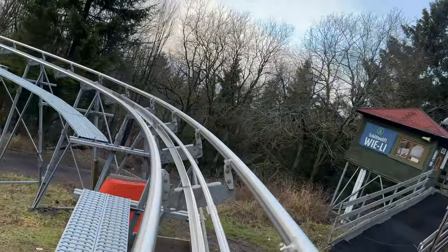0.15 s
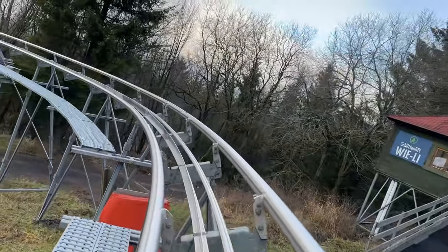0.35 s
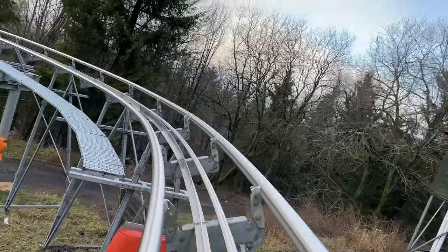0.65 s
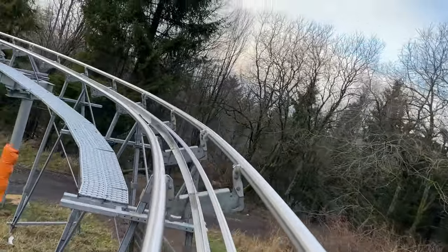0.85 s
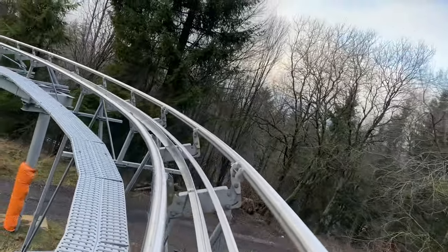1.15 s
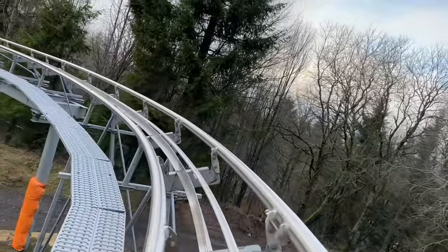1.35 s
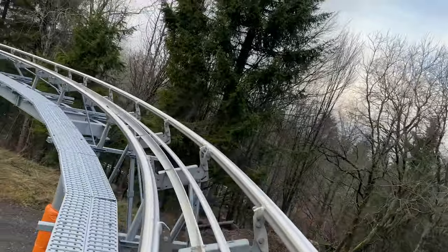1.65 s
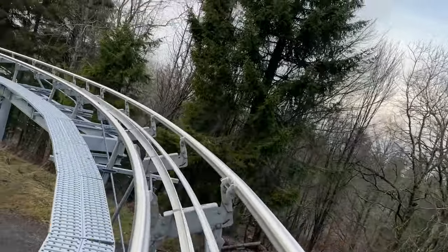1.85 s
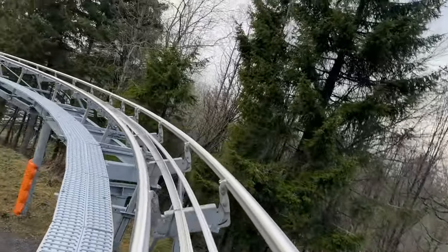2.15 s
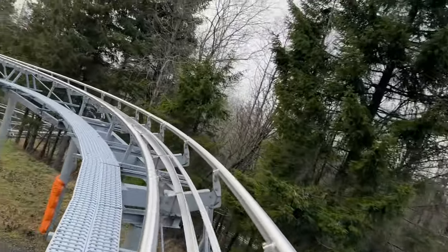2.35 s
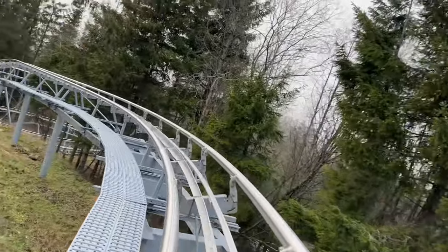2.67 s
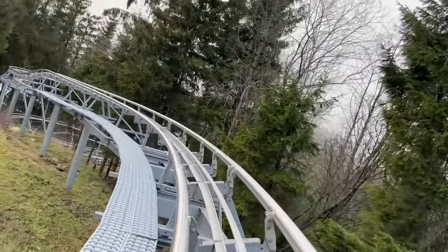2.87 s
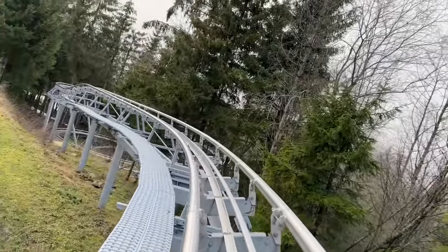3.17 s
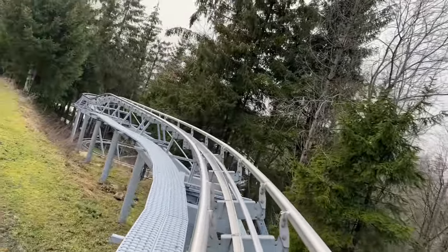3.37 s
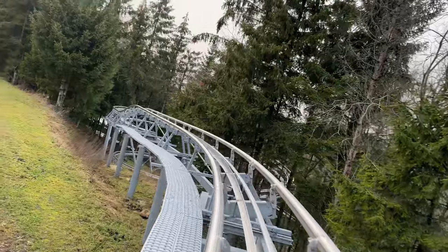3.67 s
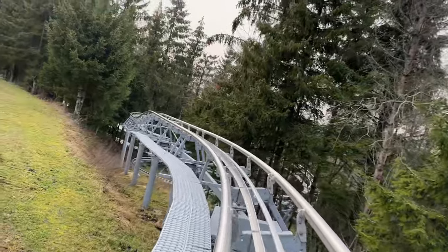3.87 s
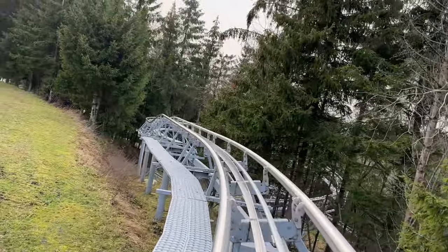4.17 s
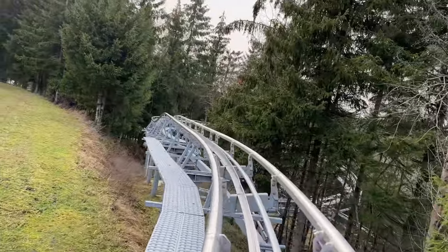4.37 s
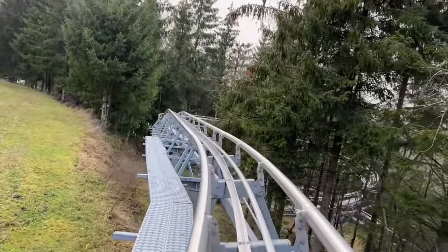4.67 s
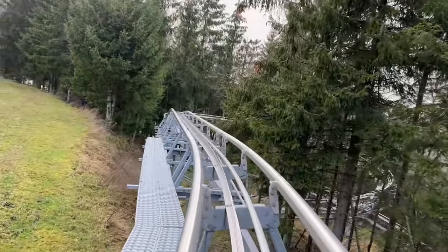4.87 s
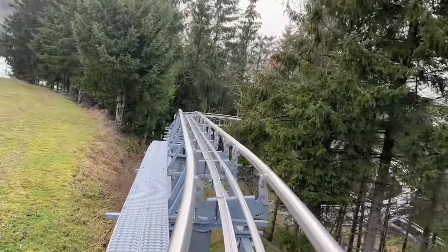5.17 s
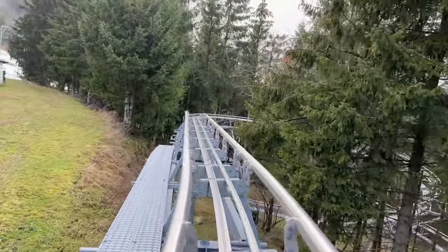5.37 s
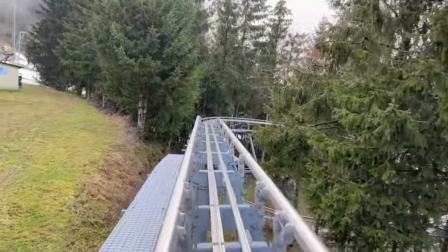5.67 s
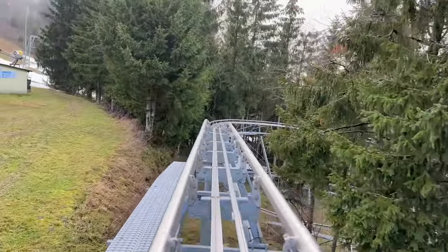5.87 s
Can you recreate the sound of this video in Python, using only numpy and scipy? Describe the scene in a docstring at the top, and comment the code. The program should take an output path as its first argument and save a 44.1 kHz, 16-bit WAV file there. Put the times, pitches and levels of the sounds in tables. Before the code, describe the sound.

A coaster sled rolls along steel rails outdoors, heard close up from on board. Its wheels make a low, slightly wavering hum and rumble throughout, with wind buffeting the microphone. A hard thump with a metal clack lands at about 0.4 seconds, followed by stronger gusts and smaller bumps until 1.1 seconds. From 1.7 to 2.8 seconds comes a busy run of rail joint knocks and rattling, briefly ringing metal parts, with the heaviest thump near 2.3 seconds. Guides rub the rails with a faint, grainy scrape. A bright clack sounds at 3.3 seconds and another thump at 3.7. Sharp clacks return around 4.3 seconds, then the wind swells, with solid knocks and clatter between 4.7 and 5 seconds. After a light clack at 5.4 seconds, quieter rolling continues to the end at about 6 seconds.

```python
"""Sled on steel rails

A sled rolls slowly round a bend on tubular steel rails in open woodland, heard close up from a phone
on board. Wind buffets the two microphone ports. The wheels hum and rumble through the sled body; rail
joints and sharp wind buffets thump; guides rub along the rails and loose metal parts clack and ring."""
import sys
import numpy as np
from scipy import signal
from scipy.fft import rfft, irfft, next_fast_len
from scipy.io import wavfile

SR = 44100
rng = np.random.default_rng(int(sys.argv[2]) if len(sys.argv) > 2 else 0)


def bounce(signal):
    """Save signal as a 16-bit WAV file at the path given by the first command-line argument."""
    frames = np.transpose(np.atleast_2d(signal))
    limited = np.clip(frames, -1, 1)
    pcm = np.round(limited * 32767).astype(np.int16)
    wavfile.write(sys.argv[1], SR, pcm)


N = 265526
HZ = np.maximum(np.fft.rfftfreq(next_fast_len(N), 1 / SR), 1)

# levels round the bend: (time [s], wind [dB], rolling noise [dB], body drone [dB])
RIDE_LEVELS = [(0, -30, -35.5, -28), (.35, -36.5, -50, -30.5), (.62, -23.5, -38.5, -30),
               (.9, -23.5, -38, -27.5), (1.125, -34.5, -42, -21), (1.145, -35.5, -38.5, -63),
               (1.47, -41, -36.5, -36), (1.66, -36, -38.5, -34.5), (1.78, -42.5, -36.5, -24.5),
               (1.84, -36.5, -34.5, -41.5), (2.28, -40, -39.5, -35), (2.45, -33.5, -37.5, -31),
               (2.75, -35, -38.5, -25), (2.9, -38, -43.5, -28), (3.4, -32.5, -40, -30.5),
               (3.58, -30.5, -45, -36.5), (3.8, -29.5, -35.5, -37), (4.2, -30.5, -44.5, -26.5),
               (4.6, -26.5, -42, -35.5), (5.0, -23, -42.5, -34), (5.3, -39, -40, -38.5),
               (5.9, -41, -40.5, -54.5), (6.02, -43.5, -37.5, -24.5)]
# gusts and jolts at the ports: (time [s], peak [dB])
WIND_BUFFETS = [(.15, -30.5), (.27, -20), (.42, -26.5), (.65, -20), (.72, -21), (.87, -16.5), (1.0, -19.5),
                (1.51, -24.5), (1.71, -26.5), (2.2, -28.5), (2.36, -23), (2.5, -30), (2.6, -29.5),
                (2.75, -26), (3.19, -29), (3.7, -21), (3.96, -20.5), (4.12, -33.5), (4.27, -29.5),
                (4.58, -25), (4.68, -21.5), (4.76, -21.5), (4.93, -24.5), (5.11, -28.5), (5.45, -30.5)]
# wind on the microphone: (frequency [Hz], relative level [dB])
WIND_SPECTRUM = [(12, -44), (25, -8), (50, 1.5), (90, 3.5), (130, -4), (190, -4.5), (270, -18.5),
                 (370, -20.5), (480, -35.5), (900, -98.5)]
# guides touching the rails: (time [s], length [s], scrape [dB], sheen [dB])
GUIDE_TOUCHES = [(0, 0.056, -73, -71.5), (.05, 1, -84.5, -88), (0.436, 0.13, -70.5, -77),
                 (0.628, 0.17, -60, -69), (0.81, 0.12, -70, -77), (1.144, 0.11, -81, -81),
                 (1.7, .2, -58.5, -74), (1.902, 0.31, -56, -67), (2.222, 0.19, -65, -74.5),
                 (2.34, .15, -57.5, -70), (2.493, 0.24, -63, -73.5), (2.682, 0.19, -60.5, -68.5),
                 (3.292, 0.11, -57, -71), (3.382, 0.09, -56, -76), (3.664, 0.14, -58.5, -71),
                 (3.917, 0.049, -69, -72), (4.07, 0.44, -64, -72), (4.365, 0.12, -61, -85),
                 (4.507, 0.14, -80, -75), (4.73, 0.45, -64.5, -72), (5.146, 0.35, -83, -80),
                 (5.388, 0.15, -63, -77)]
# midrange of the friction: (frequency [Hz], relative level [dB])
SCRAPE_SPECTRUM = [(590, -26), (1000, -18), (1160, -8.5), (1450, -0.5), (2520, -11.5), (2930, -11.5),
                   (3880, -11.5), (6800, -12.5), (8840, -52.5), (15000, -120)]
# treble of the friction: (frequency [Hz], relative level [dB])
SHEEN_SPECTRUM = [(6500, -8), (7200, -0.5), (9500, 0), (10400, -13.5), (11200, -37), (13500, -15),
                  (15800, -13)]
# guide resonances: (frequency [Hz], width [Hz], lift [dB])
GUIDE_MODES = [(2040, 97, 1.5), (2780, 150, 6), (3880, 420, 3), (5740, 300, -2)]
# wheel tone: (time [s], pitch [Hz], level [dB])
WHEEL_HUM = [(0, 176.8, -31.5), (.5, 178.8, -30.5), (1.1, 186.2, -33.5), (1.6, 190.9, -33.5),
             (2.0, 185.4, -51.5), (2.4, 185.8, -34), (3.0, 189.9, -33.5), (3.8, 186, -28.5),
             (4.4, 192.1, -34), (4.8, 190.5, -36), (5.2, 195.2, -49.5), (5.6, 184.9, -69),
             (6.02, 183.7, -34)]
# wheels on steel: (frequency [Hz], relative level [dB])
ROLL_SPECTRUM = [(120, -22), (200, -2.5), (240, -6), (490, -17.5), (644, -18.5), (896, -31), (1040, -34.5),
                 (1180, -40.5), (2200, -53.5), (4100, -65.5), (5000, -68), (6000, -65), (6300, -70),
                 (7800, -72.5), (9640, -71.5), (11400, -92.5), (15800, -97.5)]
# wheel and rail resonances: (frequency [Hz], width [Hz], lift [dB])
RAIL_MODES = [(585, 45, 9), (1038, 35, 10), (820, 30, 4), (1295, 50, 6), (1430, 45, 4), (1910, 70, 5),
              (2330, 50, 4), (2890, 50, 4), (4460, 90, 6), (5500, 300, 9)]
# blows of loose parts, weighted in four bands: (time [s], knock [dB], clank [dB], tick [dB],
# sparkle [dB], tail t60 [s], ping [dB], own pitch [Hz])
PART_BLOWS = [(0.415, -39, -51, -60, -70, 0.17, -73.5, 1300),
              (0.4482, -59, -73, -59, -79, 0.088, -69, 8500), (0.68, -33, -42, -69, -74, 0.08, -80, 1650),
              (1.562, -44.5, -71, -87, -94, 0.11, -96, 2230),
              (1.691, -39, -51, -65, -84.5, 0.11, -84, 1000),
              (1.742, -39.5, -56, -68, -79, 0.37, -90, 1260), (1.784, -51, -51, -57, -78, 0.16, -89, 4500),
              (1.853, -27, -33, -60, -87, 0.15, -75, 1920),
              (1.8595, -32.5, -46, -72, -85, 0.072, -88, 1900),
              (1.868, -34, -48, -76, -83, 0.26, -86, 1880), (1.923, -38, -62, -73, -85, 0.18, -89, 1570),
              (1.94, -34.5, -58, -66, -80, 0.32, -74, 1000), (1.956, -38, -58, -70, -85, 0.06, -90, 1350),
              (1.9663, -38, -43, -50, -56, 0.24, -65, 5500), (1.974, -37, -57, -64, -86, 0.056, -85, 1780),
              (1.985, -42, -58, -68, -85, 0.05, -82, 950), (2.1778, -29.5, -41, -57, -90, 0.12, -89, 2040),
              (2.2, -39, -67, -75, -90, 0.056, -88, 1650), (2.338, -46, -69, -80, -92, 0.07, -86, 1000),
              (2.355, -38, -60, -52, -54, 0.28, -56, 1540), (2.364, -48, -41, -44, -56, 0.12, -70, 9380),
              (2.4222, -36, -44, -70, -92, 0.05, -68, 3250), (2.582, -32, -41, -55, -83, 0.09, -91, 2050),
              (2.601, -30.5, -72, -78, -90, 0.059, -94, 1300),
              (2.61, -76, -43.5, -43.5, -56, 0.19, -69, 4700),
              (2.8031, -57, -46.5, -43.5, -45, 0.21, -66, 4100),
              (3.3286, -35, -47, -46, -52, 0.37, -74, 9500), (3.339, -44.5, -54, -57, -87, 0.17, -91, 2800),
              (3.409, -44, -63, -77, -90, 0.13, -90, 1730), (3.425, -39, -55, -80, -95, 0.14, -88, 2820),
              (3.4432, -37.5, -57.5, -85, -105.5, 0.15, -83, 1300),
              (3.662, -47, -66, -83, -91, 0.08, -89.5, 1000),
              (3.675, -49, -69, -80.5, -83, 0.13, -79, 1500), (3.793, -33, -52, -78, -87, 0.18, -88, 1550),
              (3.9115, -74, -62, -57.5, -65, 0.12, -79, 4300), (4.019, -73, -67, -72, -82, 0.13, -85, 5800),
              (4.267, -46, -43, -38.5, -54, 0.16, -72, 9200), (4.383, -50, -48, -50, -70, 0.24, -83, 9000),
              (4.39, -48, -47, -56, -66, 0.26, -90, 4700), (4.592, -67, -62.5, -71, -84, 0.072, -80, 3650),
              (4.764, -45, -60, -63, -93, 0.094, -71.5, 1000),
              (4.8463, -49, -42, -43, -57, 0.084, -62, 4000),
              (4.8521, -57, -62, -59, -72, 0.044, -93, 5700),
              (4.8785, -54, -38, -39.5, -50, 0.12, -81, 4100),
              (4.886, -44.5, -57, -60, -70, 0.06, -88, 1900),
              (5.0013, -40, -50, -83, -97, 0.063, -80, 1330), (5.407, -44, -48, -60, -82, 0.13, -99, 3700)]
# limits of the knock, clank, tick and sparkle bands: (edge [Hz])
BAND_EDGES_HZ = [800, 2600, 4600, 11200, 16500]
# low bands start softer, high ones crack: (rise [s], crack over tail [ratio], gain per bounce [dB])
BAND_ATTACKS = [(.0012, .6, -12), (.0006, 1.6, -9), (.0004, 3.2, -4), (.0003, 3.4, -3.5)]
# rattling metal: (frequency [Hz], relative level within its band [dB])
CLATTER_SPECTRUM = [(800, -5.5), (1150, -0.5), (1600, -5), (2000, -3), (2600, -7), (3000, -0.5),
                    (3600, 1.5), (4200, -7), (4700, -1), (5500, 4), (7000, -2), (9300, 2.5), (10500, -3),
                    (11250, -30.5), (12000, -7), (13500, 8.5), (14500, 3.5), (15900, 3.5)]
# resonances of the struck parts: (frequency [Hz], nominal width [Hz], weight [dB])
METAL_MODES = [(966, 50, 4.5), (1279, 42, 1.5), (1410, 82, 4), (1537, 30, 2), (1680, 21, -5),
               (1745, 52, 3.5), (1894, 71, 4.5), (1976, 57, 0.5), (2245, 66, 2), (2680, 86, 2),
               (3170, 99, -0.5), (3570, 110, 1), (4076, 130, 3.5), (4630, 180, 5), (5700, 380, 0.5),
               (8500, 400, 2), (9550, 500, 5), (10100, 400, -1.5)]
# low thumps from rail joints and sharp wind buffets, each with a short ring or low burst:
# (time [s], peak [dB], pitch [Hz], shudder [dB], burst [dB], burst pitch [Hz], burst width [Hz])
LOW_THUMPS = [(0.339, -19.5, 178.6, -39, -42, 388, 120), (0.374, -23, 167, -49, -45, 352, 120),
              (0.418, -3.5, 166.7, -49, -28.5, 589, 45), (0.534, -20.5, 167.3, -47, -47, 554, 110),
              (0.655, -13.5, 170.5, -34, -25, 326, 120), (0.688, -28, 175.6, -28.5, -37.5, 677, 70),
              (0.735, -22.5, 167, -36, -16, 278, 150.4), (0.82, -22.5, 180, -41, -27.5, 367, 130),
              (0.872, -22, 136, -32, -24, 340, 131), (0.895, -29, 175, -31, -30, 380, 130),
              (0.981, -20, 182.4, -37, -32, 335, 60), (1.043, -33, 180.6, -46, -44.5, 410, 130),
              (1.072, -20.5, 183, -44, -26, 292, 130), (1.286, -39.5, 190, -33, -37, 430, 120),
              (1.33, -30, 182.7, -33, -46, 603, 109.2), (1.396, -36, 179.3, -33, -39.5, 438, 100),
              (1.688, -10, 167, -27.5, -32.5, 646, 89.3), (1.727, -17, 175.6, -33, -49, 590, 80),
              (1.905, -19, 183, -39, -45, 564, 110), (1.917, -20, 180, -40, -48, 486, 60),
              (1.928, -16, 182.5, -27, -35, 474.5, 59.5), (1.968, -34.5, 183.5, -25.5, -38.5, 850, 90),
              (1.98, -30, 189.6, -45, -28.5, 616, 140), (2.17, -18.5, 195.4, -28, -34.5, 562, 34.45),
              (2.337, -4.5, 175.4, -23, -30, 650, 100), (2.55, -16, 161, -33.5, -56, 601.2, 109.9),
              (2.582, -15, 189.5, -26.5, -37.5, 548.5, 45), (2.835, -23.5, 181.7, -39, -42.5, 399, 110),
              (3.348, -32, 196, -37, -37.5, 577, 60), (3.445, -19, 147.3, -31.5, -39, 550, 80),
              (3.661, -9.5, 178.4, -44, -43, 520, 110.7), (3.79, -29.5, 184, -35, -35.5, 560, 100),
              (3.942, -25.5, 181, -62, -58, 603.6, 108.4), (4.355, -39, 183, -48, -41, 504, 110),
              (4.486, -28.5, 184.4, -56, -45, 544.5, 110), (4.592, -28, 183.4, -49, -37, 492, 110),
              (4.735, -7, 179.8, -27.5, -32.5, 530, 110), (4.764, -22, 111, -30.5, -19, 292.3, 131),
              (4.955, -11, 163.7, -33, -45, 610, 109.9), (4.999, -29, 192.6, -33, -61, 600, 110),
              (5.42, -41, 189, -53, -31.5, 414, 110.4)]
# the noisy shudder of a thump: (frequency [Hz], relative level [dB])
SHUDDER_SPECTRUM = [(300, -23.5), (420, 17.5), (590, 9), (700, 10), (1030, 1.5), (1300, -53.5)]
# balance of the ports: (frequency [Hz], left over right [dB])
PORT_BALANCE = [(60, 0), (110, 0), (200, 2.5), (380, 1.5), (700, .5), (1290, -.5), (2380, 1.5), (4400, 6),
                (8120, 1), (11000, -1), (15000, 0)]
# phase between the ports: (frequency [Hz], left lead [rad])
PORT_PHASE = [(180, 0), (400, -1), (1000, -1.7), (2500, -3), (4500, -4.4), (8000, -5.3),
              (12000, -2 * np.pi)]


def from_db(db):
    """Gain of a level in dB."""
    return 10 ** (np.asarray(db) / 20)


def rms_one(x):
    """Scaled to unit power."""
    return x / np.sqrt(np.mean(x ** 2) + 1e-20)


def in_time(rows):
    """Columns of a curve, one value per sample."""
    times, *columns = np.transpose(rows)
    return [np.interp(np.arange(N) / SR, times, column) for column in columns]


def on_grid(points):
    """A spectrum table read at every frequency."""
    hz, value = np.transpose(points)
    return np.interp(np.log(HZ), np.log(np.maximum(hz, 1)), value)


def lifted(modes):
    """Gain in dB of a set of resonances."""
    return sum(db / (1 + (2 * (HZ - hz) / width) ** 2) for hz, width, db in modes)


def above(hz, edge_octaves=.08):
    """Power share of each frequency that lies above a soft edge."""
    return .5 + .5 * np.tanh(np.log2(HZ / hz) / edge_octaves)


def drift(rate):
    """A random wander of spread 1, changing about rate times a second."""
    hop, settle = 40, 2000
    pole = np.exp(-2 * np.pi * rate * hop / SR)
    draws = rng.standard_normal(N // hop + settle + 2)
    slow = signal.lfilter([1], [1, -2 * pole, pole * pole], draws)[settle:]
    return np.interp(np.arange(N) / hop, np.arange(len(slow)), rms_one(slow))


def noise(colour, alike):
    """Coloured noise of unit power; alike is the correlation between the two ports."""
    left, other = rng.standard_normal((2, next_fast_len(N)))
    right = alike * left + np.sqrt(1 - alike ** 2) * other
    return rms_one(irfft(rfft([left, right]) * colour)[:, :N])


def bumps(rows, rise_s, fall_s):
    """Power envelope of (time [s], peak [dB]) events that swell up to their time and die after it."""
    t = np.arange(0, N + 40, 40) / SR
    power = sum(from_db(db) ** 2 * np.exp(-2 * np.maximum((s - t) / rise_s, (t - s) / fall_s))
                for s, db in rows)
    return np.interp(np.arange(N) / SR, t, power)


def add(out, s, sound):
    """Mixes a short sound in at time s."""
    i = round(s * SR)
    out[:, i:i + sound.shape[1]] += sound[:, :N - i]


def rail_whine(hz=3600, width_hz=90, level_db=-77):
    """A thin, faint rail tone that wavers in level."""
    line = 1 / (1 + (2 * (HZ - hz) / width_hz) ** 2)
    return from_db(level_db + 2.2 * drift(9)) * noise(line, alike=0.9)


def wind(level_db):
    """Lumpy low buffeting right on the microphone, nearly unrelated at the two ports."""
    lumps_db = 2.0 * np.array([drift(8), drift(8)])
    level = np.sqrt(from_db(level_db) ** 2 + bumps(WIND_BUFFETS, rise_s=0.036, fall_s=0.04))
    return level * from_db(lumps_db) * noise(from_db(on_grid(WIND_SPECTRUM)), alike=0.011)


def grit(per_s=90, size_db=2.5, decay_s=.004):
    """Gain of the friction, jumping at each small tick of grit."""
    ticks = (rng.random(N) < per_s / SR) * (from_db(size_db * rng.exponential(1, N)) - 1)
    pole = np.exp(-1 / (decay_s * SR))
    return rms_one(1 + signal.lfilter([1], [1, -pole], np.minimum(ticks, 1.3) + 1e-18))


def guide_rub(rise_s=.008, fade_s=.035):
    """Grainy friction noise that swells as the guides touch the rails and dies away."""
    t = np.arange(N) / SR
    power = from_db([[-80], [-89]]) ** 2  # scrape and sheen between touches
    for s, length_s, *db in GUIDE_TOUCHES:
        onset = np.clip((t - s) / rise_s + .5, 0, 1) ** 2
        release = np.exp(-2 * np.maximum(t - s - length_s + fade_s / 2, 0) / fade_s)
        power = power + from_db(db)[:, None] ** 2 * onset * release
    scrape_gain, sheen_gain = np.sqrt(power) * grit() * from_db(1.2 * drift(120))
    scrape = scrape_gain * noise(from_db(on_grid(SCRAPE_SPECTRUM) + lifted(GUIDE_MODES)), alike=0.026)
    return scrape + sheen_gain * noise(from_db(on_grid(SHEEN_SPECTRUM)), alike=0.31)


def stirred(level_db, stir_db, rise_s=.008):
    """A level in dB, raised for a moment by every thump."""
    kicks = bumps([(s + rise_s, db + stir_db) for s, db, *_ in LOW_THUMPS], rise_s, fall_s=.035)
    return 10 * np.log10(from_db(level_db) ** 2 + kicks)


def body_drone(level_db, hz=178.3, half_width_hz=40.3):
    """Rail roughness shakes the lowest resonance of the sled body."""
    resonance = 1 / (1 + ((HZ - hz) / half_width_hz) ** 2)
    return from_db(level_db) * noise(resonance, alike=0.027)


def wheel_hum():
    """A wavering tone that follows wheel speed."""
    hz, level_db = in_time(WHEEL_HUM)
    wavering_hz = hz + 2.977 * drift(5.435) + 3.01 * drift(23.8)
    phase = 2 * np.pi * np.cumsum(wavering_hz) / SR
    return from_db(level_db + 1.7 * drift(11)) * np.sqrt(2) * np.sin(phase)


def rolling(level_db, crossover_hz=1300):
    """Broad noise, lifted at wheel and rail resonances; the treble follows the load only in part."""
    colour = from_db(on_grid(ROLL_SPECTRUM) + lifted(RAIL_MODES))
    low = 1 / (1 + (HZ / crossover_hz) ** 4)
    rumble = from_db(level_db + 1.5 * drift(30)) * noise(colour * low, alike=0.17)
    hiss_db = -54.5 + 0.25 * (level_db - level_db.mean()) + 1.2 * drift(6.8)
    return rumble + from_db(hiss_db) * noise(colour * (1 - low), alike=0.11)


def bounced(sound, bounce_db, gap_s, contacts=5):
    """A struck part chatters: each row repeats quickly, weaker by its own step every time."""
    out = np.zeros_like(sound)
    for k in range(contacts):
        remaining = sound.shape[1] - round(k * gap_s * SR)
        add(out, k * gap_s, from_db(k * bounce_db)[:, None] * sound[:, :remaining])
    return out


def metal_ring(band_db, own_hz, bounce_db, gap_s, ring_db=-13, contact_s=.0004):
    """A blow and its bounces set every metal mode ringing, with its own strength at each port."""
    t = np.arange(SR // 10) / SR
    hz, width_hz, mode_db = np.transpose(METAL_MODES)
    band = np.searchsorted(BAND_EDGES_HZ, hz) - 1
    near_db = 10 * np.exp(-(np.log2(hz / own_hz) / .1) ** 2)  # louder near the blow's own pitch
    scatter_db = 2.5 * rng.standard_normal(len(hz)) + 2 * rng.standard_normal((2, len(hz)))
    strength = from_db(band_db[band] + mode_db + near_db + ring_db + scatter_db)
    polarity = rng.choice([-1, 1], len(hz))
    envelope = (1 - np.exp(-t / contact_s)) * np.exp(-np.pi * width_hz[:, None] * .8 * t)
    modes = envelope * np.sin(2 * np.pi * hz[:, None] * t)
    return (strength * polarity) @ bounced(modes, bounce_db[band], gap_s)


def clacks(crack_s=.0012, rattle_db=-12.5, ping_hz=7935, ping_t60_s=.15):
    """Loose parts strike near the microphone: a chattering crack, ringing modes, a rattling tail."""
    t = np.arange(SR // 4) / SR
    envelopes, out = np.zeros((4, N)), np.zeros((2, N))
    rise_s, crack_gain, bounce_db = np.transpose(BAND_ATTACKS)
    rise = 1 - np.exp(-t / rise_s[:, None])
    crack = rise * crack_gain[:, None] * np.exp(-t / crack_s)
    for s, *band_db, t60, ping_db, own_hz in PART_BLOWS:
        band_db = np.array(band_db)
        gap_s = .0036 * rng.uniform(.93, 1.07)
        chatter = bounced(crack, bounce_db, gap_s)
        tail = rise * from_db(-60 * t / t60)
        add(envelopes, s, from_db(band_db + rattle_db)[:, None] * (chatter + tail))
        add(out, s, metal_ring(band_db, own_hz, bounce_db, gap_s))
        ping = from_db(ping_db - 60 * t / ping_t60_s) * np.sin(2 * np.pi * ping_hz * t)
        add(out, s, ping[None])  # a small part rings on
    flicker = from_db(1.5 * drift(90))
    colour = from_db(on_grid(CLATTER_SPECTRUM) + 0.97 * lifted(METAL_MODES))
    bands = zip(envelopes, BAND_EDGES_HZ, BAND_EDGES_HZ[1:], (0.07, 0.13, 0.17, .8))
    for envelope, low_hz, high_hz, alike in bands:
        passband = np.sqrt(np.maximum(above(low_hz) - above(high_hz), 0))
        out += flicker * envelope * noise(colour * passband, alike)
    return out


def swell(hz, width_hz, order):
    """A soft blow through a chain of resonances: it builds and dies under an envelope of peak 1."""
    t = np.arange(SR // 8) / SR
    age = np.pi * width_hz * t
    envelope = (age * np.exp(1 - age / order) / order) ** order
    return envelope * np.sin(2 * np.pi * hz * t)


def thumps(rise_s=.002, shudder_t60_s=.055):
    """Rail joints and sharp wind buffets: a low thump, a brief shudder, a short ring or low burst."""
    t = np.arange(SR // 4) / SR
    tones, shudder = np.zeros((2, 1, N))
    rise = 1 - np.exp(-t / rise_s)
    for s, thump_db, thump_hz, shudder_db, burst_db, burst_hz, width_hz in LOW_THUMPS:
        add(tones, s - .0018, from_db(thump_db) * swell(thump_hz, width_hz=112, order=3)[None])
        add(tones, s + .003, from_db(burst_db) * swell(burst_hz, width_hz, order=2)[None])
        add(shudder, s, from_db(shudder_db - 60 * t / shudder_t60_s)[None] * rise)
    return tones + shudder * noise(from_db(on_grid(SHUDDER_SPECTRUM) + lifted(RAIL_MODES)), alike=0.91)


def scene():
    """The ride as it reaches the two ports on board."""
    wind_db, roll_db, drone_db = in_time(RIDE_LEVELS)
    drone = body_drone(stirred(drone_db, stir_db=-23))
    wheels = drone + wheel_hum() + rolling(stirred(roll_db, stir_db=-22))
    return wind(wind_db) + wheels + guide_rub() + rail_whine() + thumps() + clacks()


def record(dry, bass_cut_hz=43.4, top_cut_hz=16250, ceiling=1.7):
    """The phone: its ports differ in level and phase; the deepest bass and the top are cut."""
    half = from_db(on_grid(PORT_BALANCE) / 2) * np.exp(.5j * on_grid(PORT_PHASE))
    ports = irfft(rfft(dry, next_fast_len(N)) * [half, 1 / half])[:, :N]
    ports = signal.sosfilt(signal.butter(2, bass_cut_hz, "high", fs=SR, output="sos"), ports)
    ports = ceiling * np.tanh(ports / ceiling)  # the loudest thumps are rounded
    return signal.sosfilt(signal.cheby2(20, 70, top_cut_hz, fs=SR, output="sos"), ports)


dry = scene()
out = record(dry)
bounce(out)
```